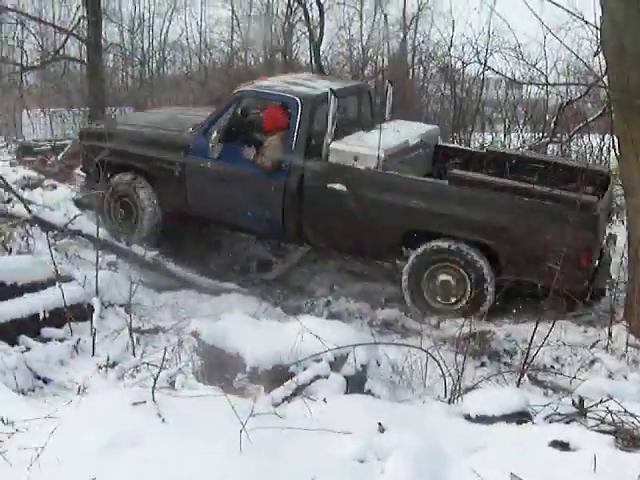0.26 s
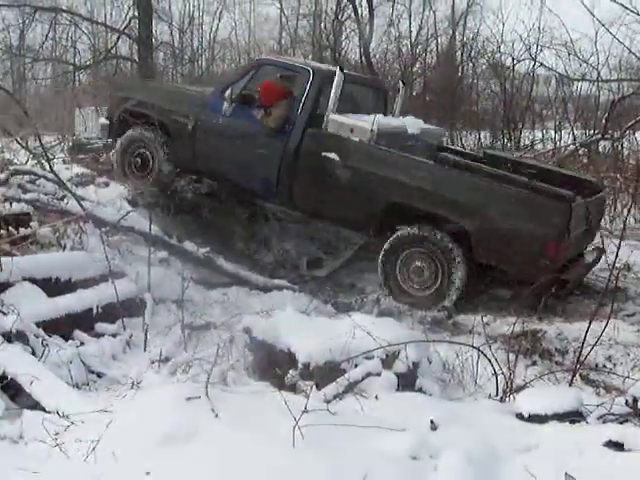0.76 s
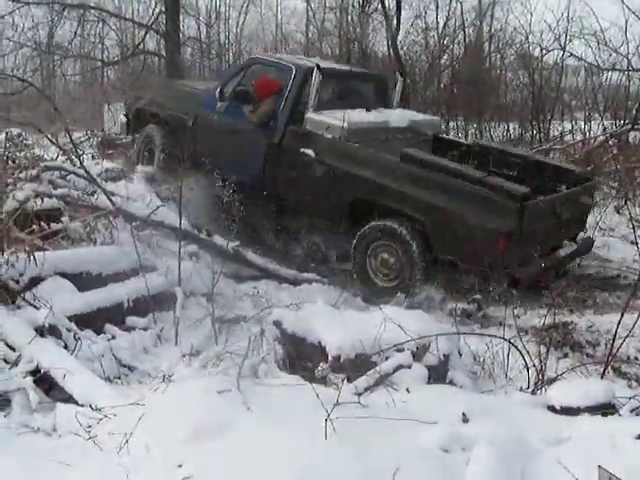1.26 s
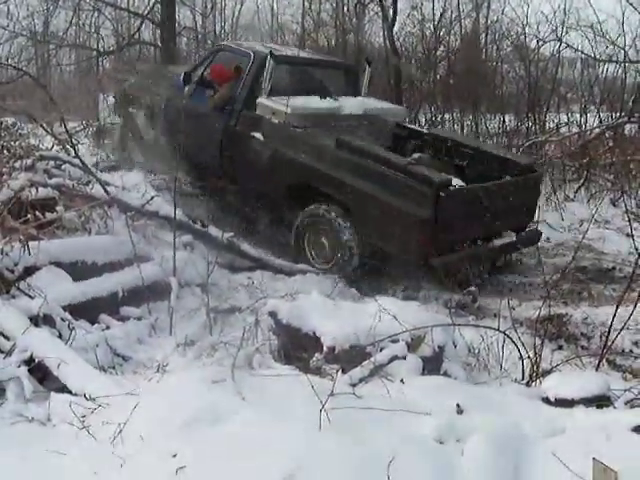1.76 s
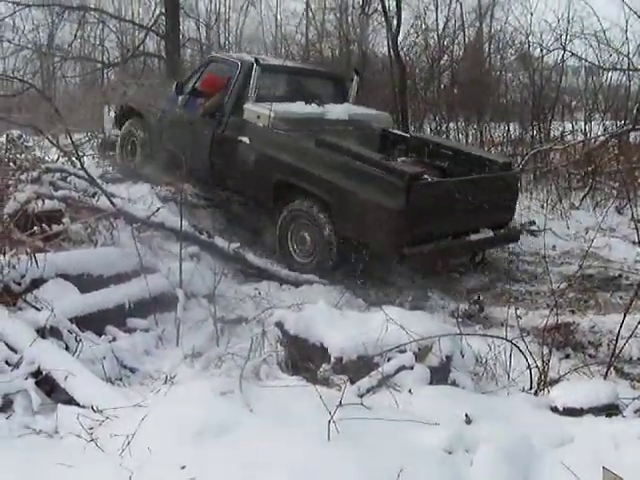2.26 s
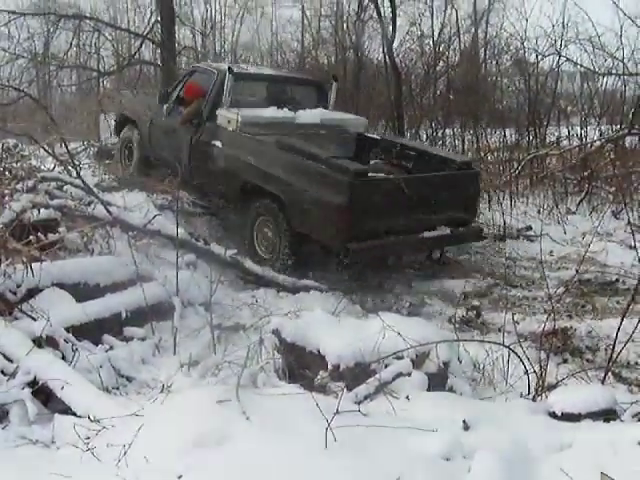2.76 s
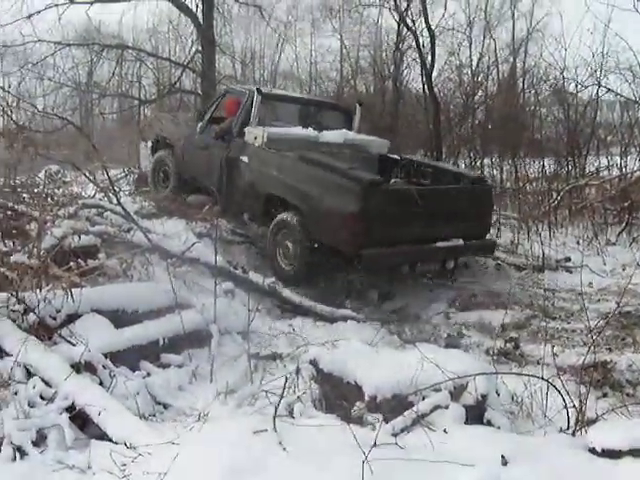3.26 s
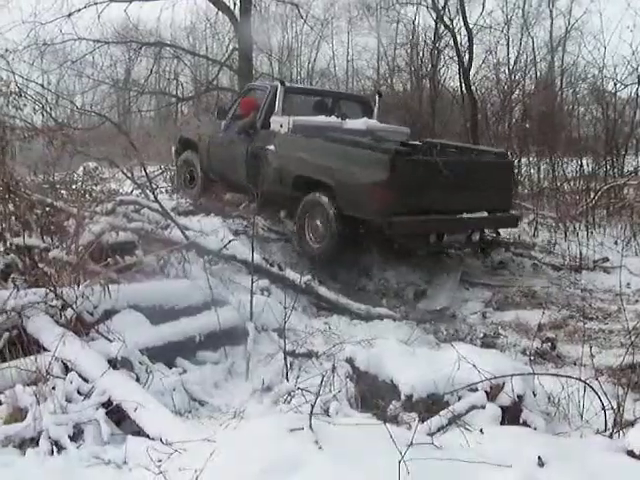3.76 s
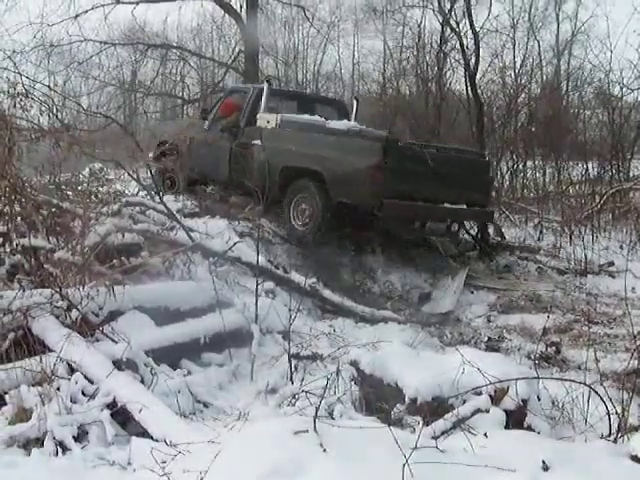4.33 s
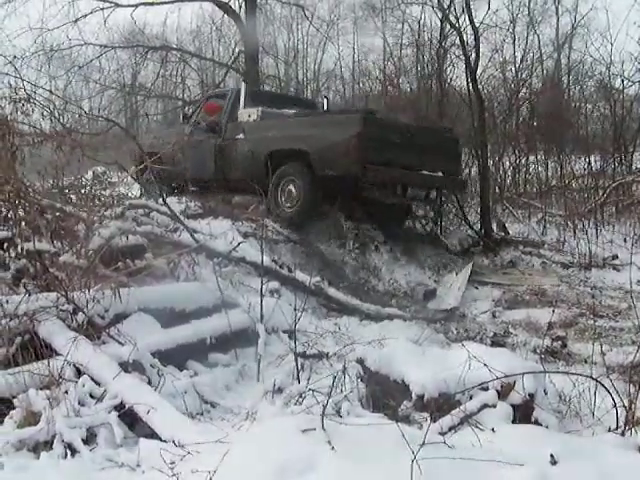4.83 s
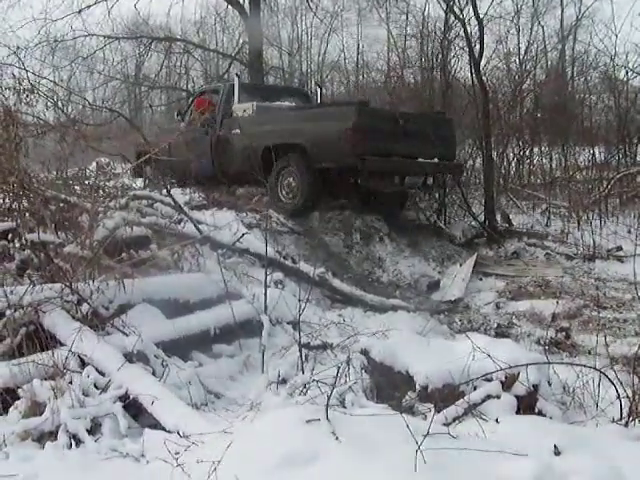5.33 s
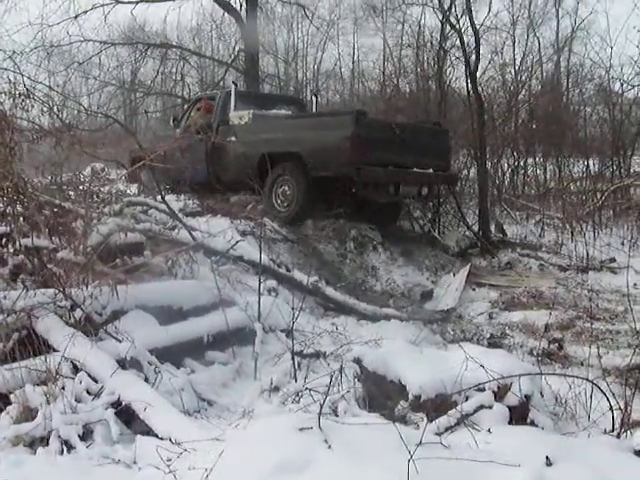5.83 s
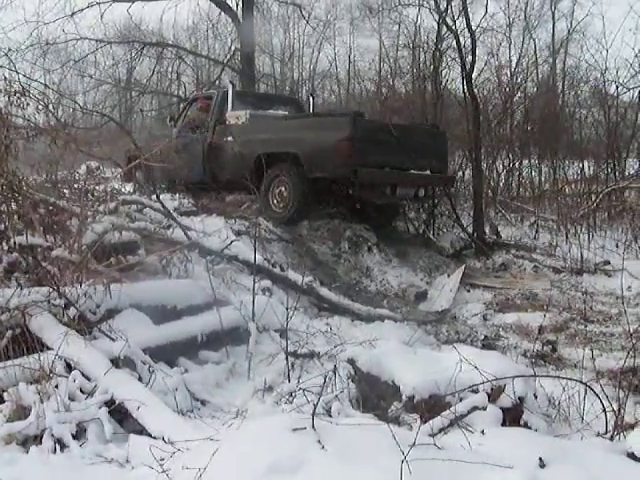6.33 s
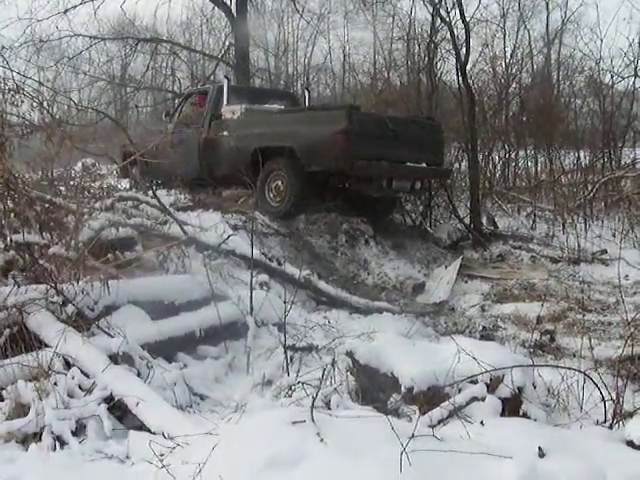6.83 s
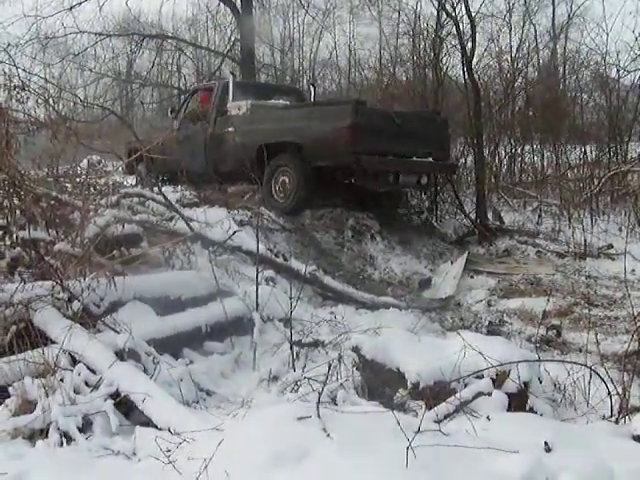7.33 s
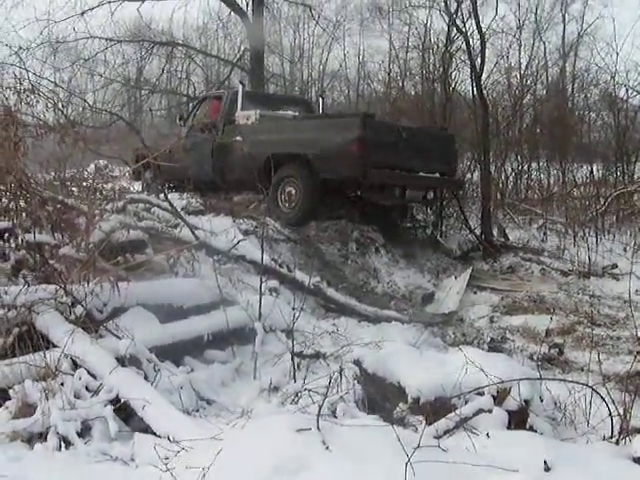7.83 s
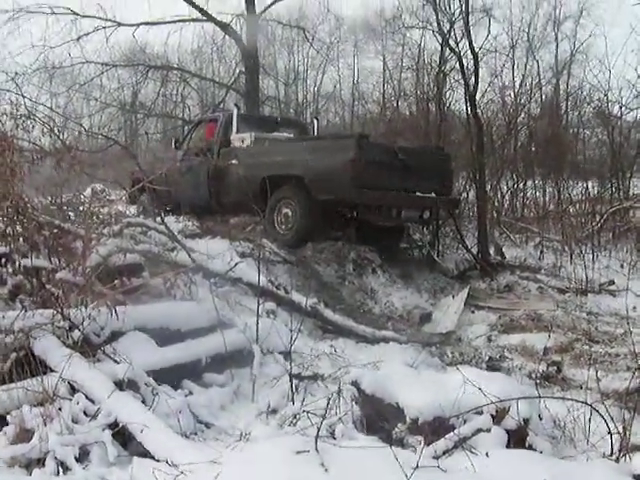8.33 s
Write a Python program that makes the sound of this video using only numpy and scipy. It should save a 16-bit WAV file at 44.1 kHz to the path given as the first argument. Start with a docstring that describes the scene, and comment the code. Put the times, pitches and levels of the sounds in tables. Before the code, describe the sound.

An old V8 pickup roars at full throttle up a snowy bank, snaps a branch, sags to a lugging idle, then revs again in stabs.

```python
"""Old V8 pickup on a snowy bank

An old V8 pickup claws up a snowy bank at full throttle, breaks a branch, bogs down and is revved again.
Uneven firing pulses ring through exhaust colours as boom and bark; filtered noise adds rasp and sizzle.
Shaped noise makes the flung snow, splintering wood, snapping twigs and wind, swept tones the tyre whine.
Bare trees answer with a short noise tail, and gusts buffet the microphone with rumble, thud and flutter."""
import sys
import numpy as np
from scipy import signal
from scipy.fft import rfft, irfft, next_fast_len
from scipy.io import wavfile
from scipy.ndimage import uniform_filter1d, map_coordinates

SR = 44100
rng = np.random.default_rng(int(sys.argv[2]) if len(sys.argv) > 2 else 0)


def inscribe(sig):
    """Save sig as 16-bit PCM at rate SR to the path in sys.argv[1].

    A 1-D sig is mono; a 2-D sig holds one channel per row.
    Samples are clipped to [-1, 1] before scaling.
    """
    pcm = np.round(np.clip(np.atleast_2d(sig).T, -1, 1) * 32767)
    wavfile.write(sys.argv[1], SR, pcm.astype(np.int16))


N = 378819  # length in samples

# Engine speed. Each row: time in seconds, crank speed in rpm.
ENGINE_SPEED = [(0, 2922), (0.36, 3000), (0.63, 3238), (0.78, 3265), (0.98, 3378), (1.08, 3395),
                (1.32, 3325), (1.55, 3205), (1.78, 3315), (1.93, 3452), (2.18, 3495), (2.28, 3540),
                (2.38, 3478), (2.58, 3455), (2.72, 3526), (2.88, 3478), (2.98, 3410), (3.25, 3288),
                (3.85, 3410), (4.06, 3305), (4.22, 3285), (4.33, 3215), (4.67, 2402), (4.9, 2279),
                (5.1, 2590), (5.28, 2985), (5.38, 3055), (5.77, 2385), (6.26, 2065), (6.55, 1965),
                (7.13, 1797), (7.23, 1850), (7.39, 2055), (7.74, 1850), (7.82, 1950), (7.99, 2365),
                (8.16, 2470), (8.25, 2610), (8.5, 3190), (8.59, 3154)]
# The long pull up the bank. Each row: time in seconds, throttle from 0 to 1.
CLIMB_THROTTLE = [(0, 0.95), (1.17, 0.92), (1.45, 0.85), (2.35, 0.98), (2.84, 0.87), (2.98, 0.83),
                  (3.72, 0.76), (4.22, 0.8), (4.37, 0.5), (5.0, 0.2), (5.6, 0.05)]
# Stabs of the pedal once the truck is stuck. Each row: start, rise and hold in seconds, throttle from 0 to 1.
PEDAL_STABS = [(4.828, 0.37, 0.12, 0.76), (7.102, 0.13, 0.15, 0.76), (7.69, 0.11, 0.12, 0.89),
               (7.912, 0.33, 0.18, 0.98)]
RELEASE_S = 0.36  # time constant of the gas flow dying away after each stab
TURN_START_S, TURN_END_S = 1.12, 4.1  # the truck swings from side-on to tail-on
REFERENCE_RPM = 3000
# Engine voices by name. Each row: level in dB at the reference speed with throttle shut and truck side-on,
# then the change in dB per octave of speed, by full throttle, and by the full turn.
VOICE_LEVELS = {"boom": (-32, -5, 13.5, 3), "drone": (-28.5, 1, 11, -9), "bark": (-24.5, 4.5, 12.5, -1.5),
                "rasp": (-45, 6, 18.5, -1.5), "rush": (-45, 4, 17, 0), "sizzle": (-45.5, 4, 20.5, 3)}
# The ways the engine runs, by name; the order sets the rows of the firing and state tables below.
ENGINE_STATES = ["straining", "racing", "dragged down", "flat out", "tail-on", "blipped", "coasting",
                 "lugging", "lunging", "picking up", "revving"]
# Passage from state to state. Each row: time in seconds, name of the state.
ENGINE_STATE_TIMES = [(.33, "straining"), (.6, "racing"), (1.12, "racing"), (1.45, "dragged down"),
                      (1.65, "dragged down"), (2.0, "flat out"), (2.7, "flat out"), (3.15, "tail-on"),
                      (4.3, "tail-on"), (4.6, "coasting"), (5.05, "blipped"), (5.35, "blipped"),
                      (5.44, "coasting"), (5.85, "coasting"), (6.3, "lugging"), (7.7, "lugging"),
                      (7.8, "lunging"), (7.93, "lunging"), (8.02, "picking up"), (8.18, "picking up"),
                      (8.3, "revving")]
# Each row: the relative sizes from 0 to 1 of the eight firings of a cycle, for one state.
FIRING_SIZES = [(0.26, 0.55, 0.29, 0.33, 0.26, 0.53, 0.32, 1),
                (0.12, 0.43, 0.66, 0.52, 0.72, 0.41, 0.67, 0.34),
                (0.12, 0.92, 0.49, 0.35, 0.18, 0.11, 0.45, 0.68),
                (0.15, 0.75, 0.51, 0.35, 0.44, 0.19, 0.45, 0.27),
                (0.24, 0.51, 0.54, 0.065, 0.61, 0.4, 0.44, 0.41),
                (0.31, 0.8, 0.13, 0.23, 0.79, 0.76, 0.55, 0.29),
                (0.45, 0.64, 0.4, 0.42, 0.16, 1, 0.78, 0.61),
                (0.5, 0.18, 0.32, 0.32, 0.77, 0.8, 0.53, 0.44),
                (0.39, 0.59, 0.091, 0.29, 0.96, 0.44, 0.41, 0.17),
                (0.46, 0.77, 0.27, 0.87, 0.41, 0.17, 0.14, 0.49),
                (0.53, 0.51, 0.13, 0.95, 0.58, 0.49, 0.31, 0.43)]
# Each row: how late the same eight firings come in firing intervals, for one state.
FIRING_LATENESS = [(-0.033, -0.21, 0.18, -0.36, 0.14, 0.32, 0.05, -0.02),
                   (-0.06, -0.033, -0.053, -0.35, 0.19, 0.3, -0.03, 0.034),
                   (-0.0063, -0.091, -0.13, -0.41, 0.24, 0.34, -0.16, 0.078),
                   (0.31, -0.12, -0.045, -0.27, -0.11, 0.42, -0.47, 0.1),
                   (0.33, -0.074, 0.134, 0.09, -0.26, 0.22, -0.279, 0.14),
                   (0.11, -0.04, 0.18, -0.25, -0.35, 0.24, -0.48, 0.15),
                   (-0.13, -0.36, 0.38, 0.017, -0.17, 0.2, -0.09, 0.08),
                   (-0.29, -0.24, 0.43, -0.2, 0.204, -0.262, 0.27, 0.17),
                   (-0.09, -0.12, 0.16, -0.18, 0.45, -0.33, -0.063, 0.09),
                   (-0.01, 0.01, -0.47, -0.32, 0.37, -0.039, -0.097, 0.45),
                   (0.06, 0.11, 0.31, -0.21, 0.33, -0.31, 0.21, 0.12)]
# Each value: change of the boom in dB, for one state.
STATE_BOOM = [0.5, -4, -1, -4.5, -1, -1.5, 2.5, 0, 0, 3, -3]
# Each value: change of the bark in dB, for one state.
STATE_BARK = [0, 0, 0.4, 0.2, 0, 0.5, -1.4, 0, 4, -4, -0.1]
# Gas hissing through a leaking joint. Each value: relative strength at one of the eight firings.
LEAK_STRENGTHS = [0.49, 0.23, 0.34, 0.81, 0.64, 0.49, .6, 0.4]
# Colour of the exhaust stacks. Each row: frequency in Hz, gain in dB.
STACK_COLOUR = [(20, 12), (45, 12.5), (60, 13), (80, 17), (100, 0), (135, -2.5), (160, -8), (185, 1.75),
                (215, -5.5), (240, -0.47), (262, 1.03), (290, -2), (325, -7), (360, -7.5), (420, -15.5),
                (600, -28)]
# Colour of the torn edge of each firing. Each row: frequency in Hz, gain in dB.
RASP_COLOUR = [(220, -18), (380, 3), (539, 0), (669, -3.5), (781, 0), (893, -7), (990, -12.5),
               (1180, -41.5), (1300, -16.5), (1690, -26.5), (2860, -120)]
# Colour of the fan's rush. Each row: frequency in Hz, gain in dB.
RUSH_COLOUR = [(590, -10.5), (1000, -2.5), (1190, -8), (1810, -5.5), (2030, -10), (2330, -7), (4440, -7.5),
               (4800, -6), (6240, -53.5), (10600, -120)]
# Colour of the escaping gas and of flung snow. Each row: frequency in Hz, gain in dB.
SIZZLE_COLOUR = [(2470, -32), (4200, -16), (4450, -19), (4920, -6.5), (5760, -0.5), (6250, -7.5),
                 (6890, -5), (8450, -21.5), (11000, -91.5), (18600, -120)]
CHUFF_DB, CHUFF_TURN = 1, 0.3  # throb at full strain: swing each way, place of its height in crank turns
# The pipe's hum with the pedal lifted. Each row: height and length in seconds, level in dB.
OVERRUN_HUMS = [(4.613, 0.18, -26), (5.503, 0.2, -21.5), (5.718, 0.55, -21.5)]
# A narrow howl among the engine's overtones; its pitch drifts between the listed times.
# Each row: height and length in seconds, frequency in Hz, level in dB.
HOWL_FLARES = [(0.296, 1.4, 704, -37), (1.002, .9, 730, -46), (2.189, 1.2, 784, -37.5),
               (2.798, 0.69, 743, -30.5), (3.754, 1.5, 794, -35), (7.32, 0.6, 820, -43.5),
               (7.88, 0.37, 815, -34)]
HOWL_WIDTH_HZ = 45  # distance from the centre at which an overtone's gain is halved
# Tyres throwing snow and frozen mud. Each row: height and length in seconds, churn and hiss levels in dB.
SNOW_SPRAYS = [(1.374, 0.59, -26, -23), (1.634, 0.29, -26.5, -30), (3.7, 0.3, -28, -26.5),
               (4.643, 0.35, -27.5, -30.5), (4.91, 0.76, -32.5, -33.5), (5.288, 0.18, -33, -45),
               (6.31, 0.6, -48, -49), (7.88, 0.16, -30, -33), (8.4, 0.42, -27.5, -31.5)]
# Colour of the churned mud. Each row: frequency in Hz, gain in dB.
CHURN_COLOUR = [(200, -26), (450, 3.5), (620, -2.5), (900, -2.5), (1300, -13), (2200, -11.5), (4000, -9.5),
                (7000, -26.5), (11000, -88)]
# Rubber and wood rubbing. Each row: start and length in seconds, first and last pitch in Hz, level in dB.
TYRE_WHINES = [(4.54, 0.72, 610, 320, -32), (4.445, 0.125, 640, 370, -21.5), (4.6, .09, 720, 960, -28)]
# A branch splintering under the truck.
# Each row: height in seconds, level in dB, rise before it in seconds, time to fall 60 dB in seconds.
BRANCH_TEARS = [(4.405, -22.5, 0.013, 0.21), (4.471, -20, 0.021, 0.27), (4.5, -15.5, 0.024, 0.1),
                (4.522, -32.5, 0.0071, 0.063)]
# Colour of the tearing wood. Each row: frequency in Hz, gain in dB.
BRANCH_COLOUR = [(200, -46), (500, -2.5), (900, -2.5), (1250, -8), (1700, -2.5), (2200, -5), (2900, -1.5),
                 (4000, -8.5), (6000, -3), (8500, -30), (12000, -58.5)]
# Modes of the steel underbody. Each row: frequency in Hz, level in dB, time to fall about 74 dB in seconds.
UNDERBODY_MODES = [(510, -7, .1), (680, -8, .09), (1040, -2, .12), (1560, -1, .07), (1830, 0, .06),
                   (2700, -2, .05), (3150, -6, .04)]
# Twigs snapping. Each row: time in seconds, level in dB.
TWIG_SNAPS = [(4.311, -12), (4.907, -17.5), (5.1285, -16.5), (5.261, -19.5), (5.618, -18), (6.25, -23.5),
              (7.3285, -15.5), (7.6249, -9), (7.822, -10), (7.877, -11.5)]
# Colour of a snap. Each row: frequency in Hz, gain in dB.
TWIG_COLOUR = [(500, -24.5), (2000, -35.5), (4200, -12.5), (5700, 2), (7000, -8), (9000, -22.5),
               (15000, -57)]
# Dull knocks. Each row: time in seconds, peak in dB, left minus right in dB.
KNOCK_TIMES = [(3.3, -12, 8), (3.937, -9, 10), (3.984, -11, 8), (4.275, -9, 5), (4.404, -7, 3),
               (4.595, -7, 3), (4.852, -4, 0), (4.942, -8, -4), (4.956, -7, -6), (5.93, -8.5, 10),
               (6.206, -7.5, 10), (6.241, -13, 8)]
# Colour of a knock. Each row: frequency in Hz, gain in dB.
KNOCK_COLOUR = [(30, -19), (130, 5), (200, 5), (300, -1), (450, -10), (750, -18.5), (1200, -38.5),
                (3000, -52.5), (9000, -73)]
# Wind on the microphone. Each row: time in seconds, level in dB.
WIND_LEVEL = [(0, -59.5), (1.0, -48.5), (1.55, -20), (2.8, -24), (3.25, -15.5), (3.6, -19), (5.1, -17.5),
              (5.55, -20), (6.9, -25.5), (7.7, -18.5), (8.59, -27)]
# Colour of the wind's rumble. Each row: frequency in Hz, gain in dB.
BUFFET_COLOUR = [(8, -20), (20, -2), (35, -1), (58, 0), (90, -4), (140, -10), (200, -16), (290, -15),
                 (400, -25), (700, -42), (1500, -80)]
# Gusts striking the microphone. Each row: time in seconds, swell in dB, relative thud in dB,
# relative flutter in dB, left minus right in dB.
WIND_GUSTS = [(1.992, -49, -9, -34, 12.5), (3.271, -27.5, -14, -15.5, 10.5),
              (3.927, -29, -10.5, -17.5, 20.5), (3.994, -36, -7.5, -26.5, 8.5),
              (4.307, -24, -26, -42.5, 15), (4.849, -25.5, -5, -32.5, -10),
              (5.92, -23.5, -5.5, -29.5, 18.5), (6.199, -32, -10, -28, 25), (6.553, -28, -7, -47, 10)]
GUST_S, FLUTTER_S = 0.46, 0.3  # length of the swell, time for the flutter to fall 60 dB
# Low modes of a gust's thud. Each row: frequency in Hz, level in dB, time to fall 60 dB in seconds.
THUD_MODES = [(32.2, 11.5, 0.051), (59, -1.5, 0.21), (135, 9, 0.07), (210, -12.5, 0.1)]
# Colour of the flutter. Each row: frequency in Hz, gain in dB.
FLUTTER_COLOUR = [(60, -24.5), (200, 5), (450, 0), (750, -8.5), (1300, -31), (3000, -41), (8000, -53.5)]
# The trees' answer. Each row: frequency in Hz, time to fall about 60 dB in seconds.
WOODS_DECAY = [(100, 0.73), (1000, 0.34), (8000, 0.033)]
# Stereo spread of noise. Each row: frequency in Hz, left-right correlation.
EAR_LIKENESS = [(25, .25), (60, .3), (125, .6), (250, .85), (1000, .9), (2500, .92), (5500, .55),
                (8000, .4)]
TOP_HZ = 16000  # band limit of the output


def amp(db):
    """Decibels to gain."""
    return 10 ** (np.asarray(db) / 20)


def unit(x):
    """Scale to rms 1."""
    return x / np.sqrt(np.mean(x ** 2) + 1e-20)


def along(points, hz):
    """Read (Hz, value) points on a log frequency axis."""
    f, v = np.transpose(points)
    return np.interp(np.log(hz + 1), np.log(f + 1), v)


def curves(rows):
    """One value per sample for each column after the time."""
    s, *cols = np.transpose(rows)
    return [np.interp(np.arange(N) / SR, s, c) for c in cols]


def wobble(rate):
    """A smooth random curve, rate knots a second."""
    knots = rng.standard_normal(int(N * rate / SR) + 4)
    return map_coordinates(knots, [np.arange(N) * rate / SR])


def swell(centre_s, length_s):
    """One smooth rise and fall, 1 at its height."""
    return np.cos(np.pi * np.clip((np.arange(N) / SR - centre_s) / length_s, -.5, .5))


def filtered(x, response):
    """Shape the spectrum of x by a gain that is a function of frequency."""
    n = x.shape[-1]
    m = next_fast_len(n + SR // 2, real=True)
    return irfft(rfft(x, m) * response(np.fft.rfftfreq(m, 1 / SR)), m)[..., :n]


def below(hz, edge_hz):
    """A steep low-pass gain."""
    return 1 / (1 + (hz / edge_hz) ** 12)


def ring(x, points, size=16384):
    """Causal colour: each pulse rings on after it arrives."""
    cepstrum = irfft(np.log(amp(along(points, np.fft.rfftfreq(size, 1 / SR)))))
    # folding the cepstrum forward gives minimum phase
    cepstrum[1:size // 2] *= 2
    cepstrum[size // 2 + 1:] = 0
    return signal.fftconvolve(x, irfft(np.exp(rfft(cepstrum))))[:len(x)]


def steady(x, span):
    """Hold the slow level at rms 1 and keep the throb inside span seconds."""
    width = int(span * SR)
    power = uniform_filter1d(uniform_filter1d(x * x, width), width)
    return x / np.sqrt(np.abs(power) + 1e-20)


def noise(points):
    """Coloured stereo noise of rms 1, its left-right likeness set for each frequency."""
    def mid_side_gains(hz):
        turn = np.arccos(np.clip(along(EAR_LIKENESS, hz), -1, 1)) / 2
        return amp(along(points, hz)) * [np.cos(turn), np.sin(turn)]

    mid, side = filtered(rng.standard_normal((2, N)), mid_side_gains)
    return unit(np.array([mid + side, mid - side]))


def pan(db):
    """Left and right gains for a left minus right level in dB."""
    return amp(np.array([[.5], [-.5]]) * db)


def impulses(samples, sizes):
    """Impulses shared between the two nearest samples."""
    whole = samples.astype(int)
    part = samples - whole
    early = np.bincount(whole, sizes * (1 - part), N + 2)
    late = np.bincount(whole + 1, sizes * part, N + 2)
    return (early + late)[:N]


def fade(x, t60):
    """Give each impulse an exponential tail that falls 60 dB in t60 seconds."""
    return signal.lfilter([1], [1, -amp(-60 / (t60 * SR))], x)


def crank_turns():
    """How far the crank has turned: the running sum of its speed."""
    return np.cumsum(curves(ENGINE_SPEED)[0]) / 60 / SR


def shares(s):
    """How much each state of the engine holds at the times s, crossfading between them."""
    times, states = zip(*ENGINE_STATE_TIMES)
    return np.array([np.interp(s, times, [float(state == name) for state in states])
                     for name in ENGINE_STATES])


def throttle():
    """One long pull, then stabs that rise, hold and die away; the widest opening wins."""
    t = np.arange(N) / SR
    stabs = []
    for s, rise, hold, depth in PEDAL_STABS:
        release = np.exp(-np.maximum(t - s - rise - hold, 0) / RELEASE_S)
        stabs.append(depth * np.clip((t - s) / rise, 0, 1) * release)
    return np.max(curves(CLIMB_THROTTLE) + stabs, axis=0)


def heading():
    """0 while the truck stands side-on, 1 once its tail faces the listener."""
    return curves([(TURN_START_S, 0), (TURN_END_S, 1)])[0]


def loudness():
    """Each engine voice's dB curve follows speed, throttle and heading; boom and bark also the state."""
    octaves = np.log2(curves(ENGINE_SPEED)[0] / REFERENCE_RPM)
    pedal, turned = throttle(), heading()
    level_db = {}
    for name, (db, speed_db, pedal_db, turn_db) in VOICE_LEVELS.items():
        level_db[name] = db + speed_db * octaves + pedal_db * pedal + turn_db * turned
    state = shares(np.arange(N) / SR)
    level_db["boom"] += np.array(STATE_BOOM) @ state
    level_db["bark"] += np.array(STATE_BARK) @ state
    return level_db


def firings(start_turn, scatter_db, jitter_s, count=8):
    """Exhaust pulses and leak pulses: eight uneven firings in two turns of the crank."""
    slots = (crank_turns() + start_turn) * count / 2
    index = np.arange(int(slots[0]) + 1, int(slots[-1]))
    state = shares(np.interp(index, slots, np.arange(N) / SR))
    strength, late = [(state * np.array(table)[:, index % count]).sum(axis=0)
                      for table in (FIRING_SIZES, FIRING_LATENESS)]
    chance = rng.standard_normal((len(index), 3))
    at = np.interp(index + late, slots, np.arange(N)) + jitter_s * SR * chance[:, 0]
    at = np.clip(at, 0, N - 1)
    sizes = strength * amp(scatter_db * chance[:, 1])
    leak_sizes = np.array(LEAK_STRENGTHS)[index % count] * amp(2.5 * chance[:, 2])
    return impulses(at, sizes), impulses(at, leak_sizes)


def exhaust(pulses, level_db):
    """The stacks colour the pulses; boom, drone and bark are three bands, each with its own level."""
    pipe = ring(pulses, STACK_COLOUR)
    boom_hz, drone_hz = 105, 180  # upper edges
    voices = {
        "boom": filtered(pipe, lambda hz: below(hz, boom_hz) * (1 - below(hz, 24))),
        "drone": filtered(pipe, lambda hz: below(hz, drone_hz) - below(hz, boom_hz)),
        "bark": filtered(pipe, lambda hz: (1 - below(hz, drone_hz)) * below(hz, 375))}
    return sum(amp(level_db[name]) * steady(voice, span=0.66) for name, voice in voices.items()) * pan(1.83)


def overrun(pipe):
    """As the revs collapse the pipe hums at three beats to two crank turns, in step with its own pulses."""
    phase = 2 * np.pi * 1.5 * crank_turns()
    # the pipe's own phase at this pitch, averaged over half a second
    lead = np.angle(signal.fftconvolve(pipe[0] * np.exp(-1j * phase), np.hanning(SR // 2), "same"))
    level = sum(amp(db) * swell(s, length) for s, length, db in OVERRUN_HUMS)
    return level * np.cos(phase + lead) * pan(1.3)


def gas(pulses, leaks, level_db):
    """Each firing tears out a rasp; the leaking joint spits a sizzle over the rush of the fan."""
    edge = steady(ring(pulses, RASP_COLOUR), span=0.073)
    # each spit swells for a moment before it dies
    spits = steady(fade(fade(leaks, t60=.018), t60=.007), span=.15)
    breathy = .5 * steady(.3 + spits, span=.13) * noise(RASP_COLOUR)
    rasp = amp(level_db["rasp"]) * (edge + breathy)
    rush_gain = amp(level_db["rush"] + 1.35 * wobble(60))
    rush = rush_gain * steady(1 + .55 * spits, span=0.29) * noise(RUSH_COLOUR)
    sizzle_gain = amp(level_db["sizzle"] + 1.3 * wobble(130))
    sizzle = sizzle_gain * steady(1 + .75 * spits, span=0.2) * noise(SIZZLE_COLOUR)
    return rasp * pan(1.8) + rush * pan(4.2) + sizzle * pan(5.3)


def chuff():
    """One bank blows harder than the other, so under strain the gas throbs once in two crank turns."""
    strain = shares(np.arange(N) / SR)[ENGINE_STATES.index("straining")]
    return amp(CHUFF_DB * strain * np.cos(np.pi * (crank_turns() - CHUFF_TURN)))


def howl():
    """The engine's overtones flare up as they glide through a narrow resonance of drifting pitch."""
    cycle_hz = curves(ENGINE_SPEED)[0] / 120  # one cycle is two crank turns
    angle = np.pi * crank_turns()
    centre_hz, = curves([(s, hz) for s, _, hz, _ in HOWL_FLARES])
    tone = np.zeros(N)
    for k in range(21, 50):
        resonance = 1 / (1 + ((k * cycle_hz - centre_hz) / HOWL_WIDTH_HZ) ** 2)
        tone += np.sin(k * angle + rng.uniform(0, 2 * np.pi)) * resonance
    level = sum(amp(db) * swell(s, length) for s, length, _, db in HOWL_FLARES)
    return level * steady(tone, span=0.18) * amp(1.1 * wobble(25)) * pan(2.9)


def spray():
    """The tyres churn the frozen mud and fling hissing snow: two noises swell and flicker together."""
    churn = sum(amp(db) * swell(s, length) for s, length, db, _ in SNOW_SPRAYS)
    hiss = sum(amp(db) * swell(s, length) for s, length, _, db in SNOW_SPRAYS)
    mud = churn * noise(CHURN_COLOUR) * pan(2.3)
    snow = hiss * noise(SIZZLE_COLOUR) * pan(7.8)
    return amp(3.1 * wobble(110)) * (mud + snow)


def whine():
    """A tyre slipping on ice and wood sings unsteady notes that glide in pitch."""
    notes = np.zeros(N)
    for s, length, first_hz, last_hz, db in TYRE_WHINES:
        hz, = curves([(s, first_hz), (s + length, last_hz)])
        phase = 2 * np.pi * np.cumsum(hz * (1 + .04 * wobble(140))) / SR
        notes += amp(db) * swell(s + length / 2, length) * np.sin(phase)
    return notes * amp(0.93 * wobble(61)) * pan(3.5)


def branch():
    """Wood fibres strain, tear in a few ragged bursts and clank against the underbody."""
    now = np.arange(N) / SR
    tearing = np.zeros(N)
    for s, db, rise, t60 in BRANCH_TEARS:
        tearing += amp(db - 60 * np.maximum(now - s, 0) / t60) * np.clip(1 + (now - s) / rise, 0, 1)
    wood = tearing * amp(4.7 * wobble(360)) * noise(BRANCH_COLOUR)
    t = np.arange(SR // 4) / SR
    steel = sum(amp(db) * 0.0002 ** (t / decay_s) * np.sin(2 * np.pi * hz * t)
                for hz, db, decay_s in UNDERBODY_MODES)
    clank = signal.fftconvolve(wood, steel[None] / np.linalg.norm(steel), axes=1)[:, :N]
    return (wood + amp(-14) * clank) * pan(3)


def twigs():
    """Thin sticks break with one bright click of fading noise each."""
    s, db = np.transpose(TWIG_SNAPS)
    return fade(impulses(s * SR, amp(db)), t60=0.018) * noise(TWIG_COLOUR) * pan(1.3)


def knocks():
    """Short dull blows, each one coloured impulse that dies quickly."""
    s, db, side_db = np.transpose(KNOCK_TIMES)
    blow = ring(signal.unit_impulse(SR // 10), KNOCK_COLOUR)
    hits = np.array([impulses(s * SR, side) for side in amp(db) * pan(side_db)])
    return signal.fftconvolve(hits, blow[None] / np.abs(blow).max(), axes=1)[:, :N]


def wind():
    """Wind rumbles on the microphone; gusts swell to one side, with a low thud and a short flutter."""
    strength = amp(curves(WIND_LEVEL)[0]) * pan(0.57)
    for s, db, _, _, side in WIND_GUSTS:
        strength = strength + amp(db) * swell(s, GUST_S) ** 2 * pan(side)
    rumble = strength * amp(0.77 * wobble(17)) * noise(BUFFET_COLOUR)
    s, _, thud_db, flutter_db, side_db = np.transpose(WIND_GUSTS)

    def strikes(db):
        return np.array([impulses(s * SR, side) for side in amp(db) * pan(side_db)])

    t = np.arange(SR // 3) / SR
    modes = sum(amp(level - 60 * t / t60) * np.sin(2 * np.pi * hz * t) for hz, level, t60 in THUD_MODES)
    # each strike is softened before it excites the low modes
    blows = fade(strikes(thud_db - 44), t60=0.0048)
    thud = signal.fftconvolve(blows, modes[None], axes=1)[:, :N]
    # a short average rounds the onset of the flutter
    flutter = uniform_filter1d(fade(strikes(flutter_db - 1), t60=FLUTTER_S), int(0.0062 * SR))
    return rumble + thud + flutter * noise(FLUTTER_COLOUR)


def woods(x):
    """Trunks scatter a short diffuse answer: decaying noise, different at each ear."""
    hz, t, z = signal.stft(rng.standard_normal((2, SR // 2)), SR, nperseg=256)
    decay = 0.00096 ** (t / along(WOODS_DECAY, hz)[:, None])
    tail = signal.istft(z * decay, SR, nperseg=256)[1]
    return signal.fftconvolve(x, tail / np.linalg.norm(tail[0]), axes=1)[:, :N]


def scene():
    """The truck and what it runs over, among the trees; the boom also rolls back from the bank."""
    pulses, leaks = firings(start_turn=1.03, scatter_db=.5, jitter_s=.00002)
    level_db = loudness()
    pipe = exhaust(pulses, level_db)
    pipe = pipe + overrun(pipe)
    bright = gas(pulses, leaks, level_db) * chuff() + howl()
    bright = bright + spray() + whine() + branch() + twigs()
    boom = filtered(pipe, lambda hz: below(hz, 85))
    return pipe + bright + knocks() + wind() + amp(-16) * woods(bright + boom)


def record(dry):
    """Flatten peaks at full scale, dull the treble down to a faint floor and cut all above the band limit."""
    dull = filtered(np.clip(dry, -1, 1), lambda hz: below(hz, 7270) + amp(-27))
    return filtered(dull, lambda hz: hz < TOP_HZ)


dry = scene()
out = record(dry)
inscribe(out)
```